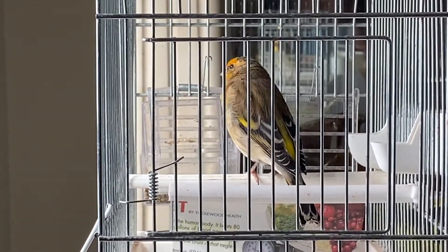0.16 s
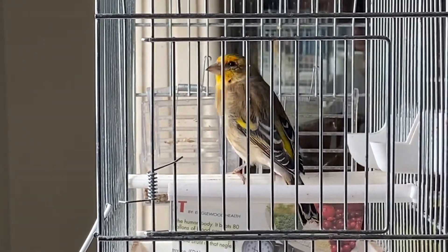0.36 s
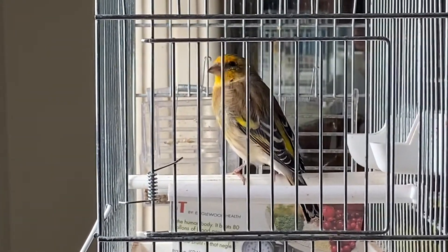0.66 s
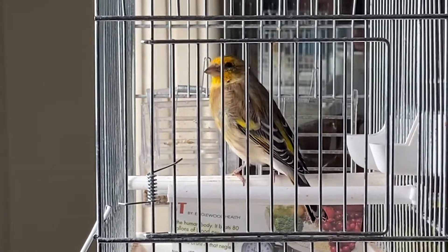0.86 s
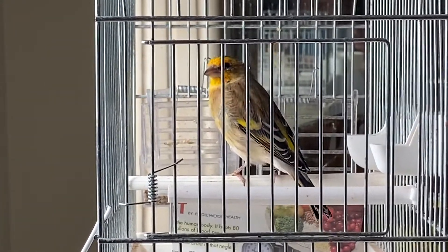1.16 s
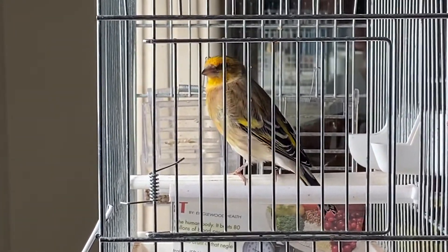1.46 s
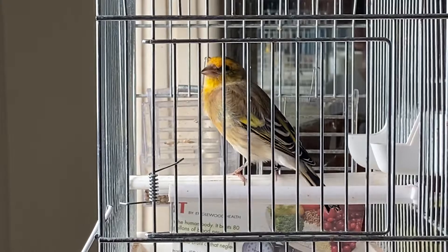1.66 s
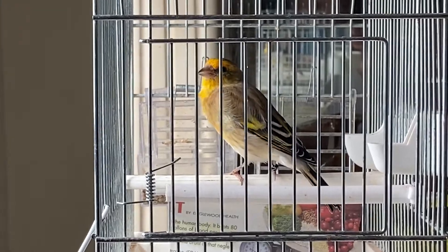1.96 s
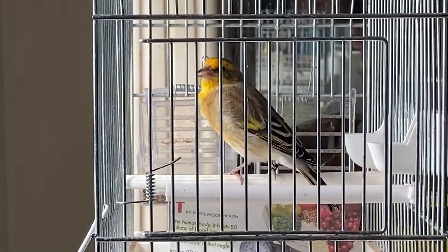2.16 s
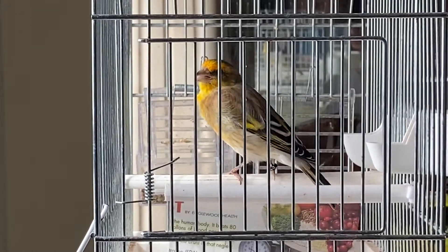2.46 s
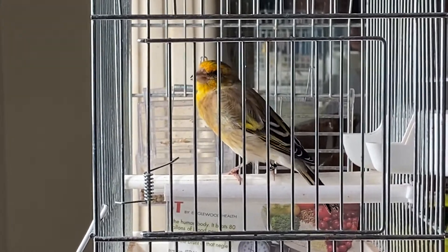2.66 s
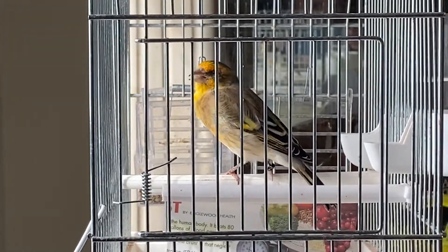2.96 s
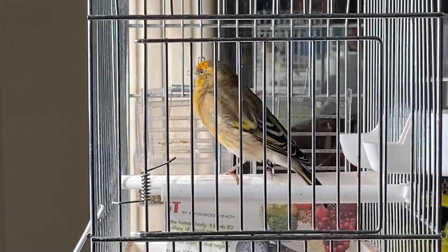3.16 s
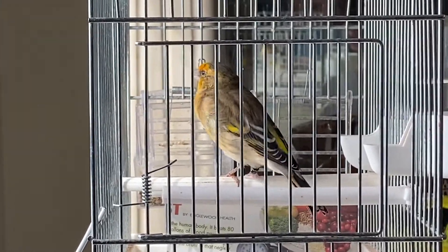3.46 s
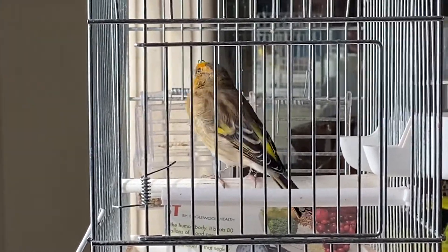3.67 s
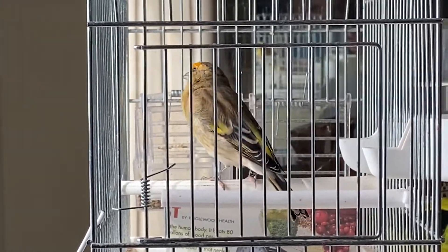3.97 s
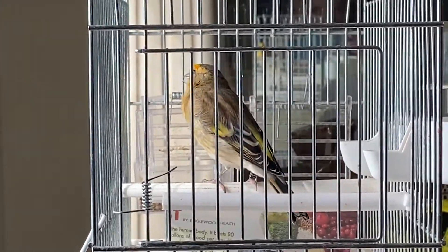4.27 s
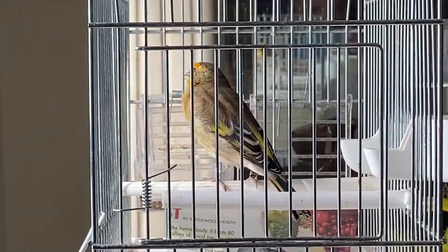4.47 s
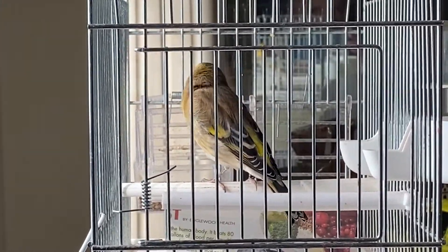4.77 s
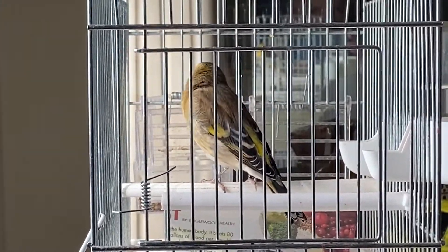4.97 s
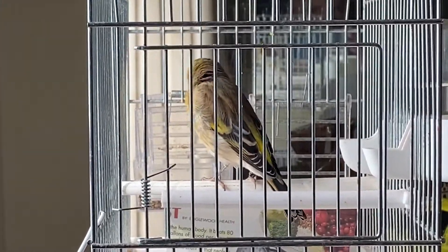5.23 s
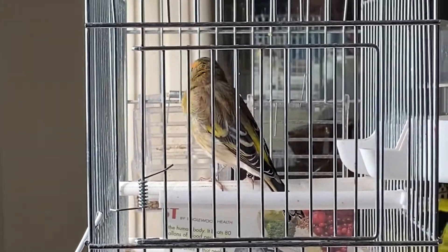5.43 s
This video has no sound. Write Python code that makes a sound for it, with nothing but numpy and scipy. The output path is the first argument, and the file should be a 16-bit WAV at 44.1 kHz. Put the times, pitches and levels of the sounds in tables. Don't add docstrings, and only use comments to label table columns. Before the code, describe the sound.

A small caged finch sings a rapid, high twittering run of gliding whistles in a small echoing room over a faint low hum.

```python
import sys
import numpy as np
from scipy import signal
from scipy.fft import rfft, irfft, next_fast_len
from scipy.io import wavfile
from scipy.ndimage import uniform_filter1d

SR = 44100
rng = np.random.default_rng(int(sys.argv[2]) if len(sys.argv) > 2 else 0)


def persist_wave(psi):
    counts = np.round(np.clip(psi, -1, 1) * 32767).astype(np.int16)
    wavfile.write(sys.argv[1], SR, np.atleast_2d(counts).T)


def level_to_linear(level):
    exponent = np.asarray(level, float) / 20
    return 10 ** exponent


N = 246959


def evened(x):
    return x / np.sqrt(np.mean(x ** 2) + 1e-20)


def read(points, hz):
    f, value = np.transpose(points)
    return np.interp(np.log(hz + 1), np.log(f + 1), value)


def add(mix, s, sound):
    part = mix[round(s * SR):][:len(sound)]
    part += sound[:len(part)]


def drift(size, hz):
    lead_in = 4000
    b, a = signal.butter(N=2, Wn=hz, fs=SR)
    return evened(signal.lfilter(b, a, rng.standard_normal(size + lead_in))[lead_in:])


def resonate(x, hz, width):
    turn = np.exp(2j * np.pi * np.cumsum(hz * np.ones(len(x))) / SR)
    r = np.exp(-np.pi * width / SR)
    return 2 * (turn * signal.lfilter([1 - r], [1, -r], x / turn)).real


def air():
    # (frequency [Hz], level per Hz [dB])
    air_tone = [(22, -27), (36, -5), (56, 3.5), (98, -9), (150, -8.5), (190, -10.5), (235, -7),
                (330, -18.5), (600, -23.5), (1700, -34), (5200, -50), (5900, -52.5), (9000, -56.5),
                (16000, -65.5)]
    # (frequency [Hz], likeness [-1 to 1])
    likeness = [(60, 0.97), (130, 0.91), (290, 0.6), (640, 0.28), (1400, 0.07), (2000, 0.24), (3000, 1),
                (7000, 1), (15000, .9)]
    # (frequency [Hz], left over right [dB])
    left_lean = [(60, .6), (125, 3.5), (250, 1.2), (500, 1.8), (2000, 0)]
    frames, hz = N // 512 + 5, np.fft.rfftfreq(2048, 1 / SR)
    a, b, c, d = rng.standard_normal((frames, 1025, 4)).T
    same = np.clip(read(likeness, hz), -1, 1)[:, None]
    left = a + 1j * b
    right = same * left + np.sqrt(1 - same ** 2) * (c + 1j * d)
    lean_db = np.multiply.outer([.5, -.5], read(left_lean, hz))[:, :, None]
    z = np.array([left, right]) * level_to_linear(read(air_tone, hz)[:, None] + lean_db)
    noise = signal.istft(z, nperseg=2048, noverlap=1536)[1][:, :N]
    return level_to_linear(-51.5) * evened(noise)


def fridge(motor_hz=58.69, waver_db=5.0, wander=0.00017):
    # (frequency [Hz], level [dB])
    casing = [(59, -58), (120, -72), (590, -80), (950, -100.5), (1115, -80), (1300, -109), (2150, -90.5),
              (2340, -81.5), (2550, -89.5), (3120, -102.5), (3230, -82.5), (3400, -101), (5150, -99),
              (5280, -93.5)]
    turns = np.cumsum(motor_hz * (1 + wander * drift(N, 1.46))) / SR
    t = np.arange(0, N, 64) / SR
    out = np.zeros(N)
    for k, (phase, rate, shift) in enumerate(rng.random((95, 3)), start=1):
        swell_db = waver_db * np.sin(2 * np.pi * ((0.419 + 2 * rate) * t + shift))
        level_db = read(casing, k * motor_hz) - 8 * max(k - 90, 0) + swell_db
        level = np.repeat(np.sqrt(2) * level_to_linear(level_db), 64)[:N]
        out += level * np.sin(2 * np.pi * (k * turns + phase))
    return out


def far_bird(width_hz=1300):
    # (time [s], length [s], level [dB], first pitch [Hz], last pitch [Hz])
    far_calls = [
        (.14, .15, -83, 6600, 5900),
        (.6, .08, -84, 6760, 6700),
        (.76, .07, -83, 6710, 6600),
        (.87, .24, -71, 4250, 3470),
        (1.027, 0.21, -72, 4850, 5400),
        (1.153, 0.13, -75, 3590, 3510),
        (1.214, 0.18, -72.5, 4670, 4300),
    ]
    out = np.zeros(N)
    for s, length, db, first_hz, last_hz in far_calls:
        u = np.arange(0, length, 1 / SR) / length
        hz = first_hz + (last_hz - first_hz) * u
        noise = np.resize(rng.standard_normal(SR // 2), len(u))
        fuzz = resonate(resonate(noise, hz, width_hz), hz, width_hz)
        swell_db = np.interp(u, [0, .33, 1], [-9, 0, -9])
        add(out, s, level_to_linear(db + swell_db) * evened(fuzz))
    return out * level_to_linear(1.4 * drift(N, 40))


def notes():
    # (time [s], length [ms], first pitch [Hz], goal pitch [Hz], level [dB])
    snaps = [(1.559, 25, 4566, 4796, -22.5), (1.62, 31, 6240, 3562, -19.5), (1.847, 35, 7560, 5640, -22),
             (1.987, 18, 3563, 3456, -21), (2.087, 42, 7200, 3177, -21.5), (2.222, 16.6, 7100, 3480, -19),
             (2.5164, 16, 7030, 3462, -20.5), (3.1211, 3.2, 5310, 4410, -19.5),
             (3.1222, 4.4, 4690, 3620, -26), (3.4216, 12, 6030, 5390, -19.5),
             (4.0816, 11.4, 2640, 3432, -28.5), (4.4988, 15, 4350, 3680, -29.5),
             (4.9658, 29, 3110, 3357, -27), (5.4254, 23.5, 5740, 5017, -28),
             (5.5327, 26, 2670, 4260, -31.5), (5.557, 21, 4260, 5050, -26.5)]
    chirps = [(1.544, 17.4, 5494, 4330, -24.5), (3.017, 15.5, 8400, 5200, -22.5),
              (2.9512, 19, 5080, 4398, -19), (3.126, 15, 3730, 2500, -47), (1.9681, 40.7, 4870, 3304, -21),
              (2.5621, 6.8, 5510, 3440, -25.5), (2.567, 11.6, 7100, 4960, -28),
              (2.6689, 15, 3295, 2120, -30), (2.7944, 21.6, 6420, 1570, -21.5),
              (2.857, 18.1, 5930, 4710, -21.5), (2.937, 14, 5360, 1990, -24.5),
              (2.942, 7.9, 7770, 4580, -28), (3.023, 10.6, 5600, 4600, -22),
              (3.1733, 11, 4360, 3330, -30.5), (3.18, 12, 7310, 4750, -24), (3.52, 32.3, 6900, 6270, -22),
              (4.6466, 20.8, 4480, 3540, -34), (4.8918, 21.6, 2470, 1870, -33.5),
              (5.327, 42, 5200, 3510, -35.5), (5.5691, 43, 4150, 3498, -23)]
    pips = [(3.721, 11, 3580, 5850, -45), (4.07, 12.2, 2660, 6720, -31.5), (4.24, 31, 5700, 7800, -26.5),
            (2.077, 9.7, 4820, 7630, -33), (1.538, 9.2, 3740, 5260, -32), (3.7428, 20.4, 5170, 7300, -28),
            (3.853, 12, 3390, 5040, -27), (3.9716, 15, 3650, 5320, -25.5), (4.3499, 10, 5470, 5830, -26),
            (4.4065, 23, 4310, 5220, -30), (5.532, 21, 5700, 7800, -40)]
    falls = [(1.876, 45.3, 5040, 4645, -24), (2.736, 17, 7860, 4320, -32), (2.738, 7, 6110, 4150, -25),
             (2.805, 20.4, 5390, 3400, -28.5), (3.1215, 15, 5710, 4380, -25.5),
             (3.2956, 8.2, 5830, 5420, -18), (3.3066, 8.7, 5335, 4750, -21),
             (1.6065, 15.7, 6950, 5900, -36), (3.406, 32, 6990, 5540, -27),
             (3.473, 39.6, 7290, 6200, -16.5), (3.61, 46, 7250, 6244, -17.5),
             (4.261, 25, 7960, 3620, -24.5), (4.431, 20.7, 5810, 1730, -25), (4.612, 12.7, 5530, 4320, -32),
             (4.978, 10, 7800, 7130, -38), (5.035, 30, 5800, 3900, -38), (5.278, 14.4, 2610, 2130, -28.5),
             (5.399, 23, 3320, 2920, -40), (5.052, 35.6, 2858, 2693, -23), (5.094, 29, 2645, 2230, -29),
             (5.321, 37, 2610, 1830, -29.5), (4.088, 27, 5850, 4610, -34.5),
             (5.362, 6.9, 3340, 2520, -34.5), (5.5528, 8.8, 5120, 4050, -27.5)]
    rises = [
        (2.968, 17.7, 4320, 4556, -17.5),
        (5.007, 22.2, 4840, 5780, -30),
        (1.601, 8, 5460, 7000, -30.5),
        (2.295, 16, 3280, 6070, -26.5),
        (3.943, 12.5, 2560, 5260, -34),
        (3.9598, 19.5, 2537, 4160, -25),
        (4.364, 12, 3957, 7340, -23.5),
    ]
    tips = [(1.7178, 29.7, 4993, 5430, -23.5), (2.311, 31, 3660, 1935, -18.5),
            (2.6926, 7.7, 5090, 4540, -35.5), (2.854, 4, 4540, 5750, -18), (3.0299, 5.2, 5650, 5260, -21),
            (3.2898, 6.4, 5010, 3840, -28), (3.5502, 4.9, 5840, 6180, -19), (3.274, 22, 6340, 7240, -28),
            (3.836, 16, 4630, 6280, -34), (3.8464, 6.5, 3062, 3150, -25), (4.1525, 18.3, 4024, 4820, -23.5),
            (4.513, 5.2, 4286, 3120, -22.5), (4.83, 40, 3160, 2500, -34.5), (5.227, 37, 3386, 3050, -35),
            (5.277, 5.3, 5790, 4660, -36)]
    arches = [(1.527, 10.5, 3400, 2890, -38), (1.7443, 13.8, 5140, 4484, -23),
              (1.8298, 12.5, 8080, 7110, -35.5), (1.939, 33.3, 4460, 4790, -23),
              (3.551, 16, 4750, 4682, -25.5), (4.358, 17, 5600, 3950, -34.5), (4.379, 9.2, 5910, 6720, -22),
              (4.4172, 19, 5320, 5850, -30), (4.5006, 11.7, 5070, 4275, -23),
              (4.5905, 12.3, 4460, 5160, -32.5), (4.8624, 40, 2630, 2517, -26),
              (4.9696, 32.3, 3590, 4116, -28.5), (5.214, 64, 2683, 2304, -32.5),
              (5.366, 56, 4210, 4880, -32)]
    hooks = [
        (2.6836, 18.3, 2280, 2522, -24),
        (2.7284, 18, 5300, 3510, -29.5),
        (3.4161, 16, 4570, 4713, -25.5),
        (3.731, 11, 5950, 5355, -21),
        (4.8166, 51.5, 3700, 4177, -30),
        (5.0293, 3.4, 5440, 5720, -25),
    ]
    # (time [s], length [ms], pitch [Hz], level [dB])
    level_notes = [(5.006, 18, 5900, -38), (5.288, 14, 4370, -35.5), (2.7032, 18, 3406, -28),
                   (3.4345, 6.9, 4910, -24.5), (3.606, 7, 6960, -19.5), (4.164, 37, 6320, -35.5),
                   (4.6742, 26, 3398, -25), (4.9043, 18, 2720, -34.5), (5.075, 9.7, 2665, -19),
                   (5.449, 9.6, 4970, -28.5), (5.359, 8.7, 4270, -29.5), (5.577, 72, 7800, -34)]
    # (time [s], top pitch [Hz], drop level [dB], slide level [dB])
    rattle = [
        (2.1432, 5540, -18, -27),
        (2.1818, 6910, -24, -29.5),
        (2.3787, 4970, -20.5, -24),
        (2.4266, 5990, -21.5, -24),
        (2.4702, 5620, -20, -23.5),
    ]
    sagging = [(s, ms, hz, hz * .98, db) for s, ms, hz, db in level_notes]
    drops = [(s, 9, top_hz, 3400, drop_db) for s, top_hz, drop_db, _ in rattle]
    slides = [(s + .0023, 19, 3790, 2500, slide_db) for s, _, _, slide_db in rattle]
    kinds = [((.92, .95), snaps),
             ((.72, 1), chirps + pips + drops),
             ((.52, 1), falls + rises + slides),
             ((.191, 1), tips + sagging),
             ((1, .015), arches),
             ((1, .93), hooks)]
    song = []
    for (half, last), rows in kinds:
        for s, ms, first, goal, db in rows:
            way = goal - first
            song.append((s, ms, first, first + half * way, first + last * way, db))
    return song


def glide(start, middle, end, u):
    first, second = middle - start, end - middle
    if first * second > 0 and abs(second - first) > 1:
        bend = (second / first) ** 2
        return start + (end - start) * (bend ** u - 1) / (bend - 1)
    return start + 4 * first * u * (1 - u) + (end - start) * u * (2 * u - 1)


def throb(depth=.7):
    # (time of first puff [s], puffs [count], rate [puffs per s])
    puffing = [
        (3.4855, 6, 79),
        (3.621, 4, 98),
        (5.367, 6, 115),
        (5.432, 4, 128),
    ]
    gain = np.zeros(N)
    for s, puffs, rate in puffing:
        turns = np.arange(-.25, puffs - .75, rate / SR)
        add(gain, s + turns[0] / rate, depth * np.cos(2 * np.pi * turns))
    return 1 + gain


def finch(flutter_db=2.0, flutter_hz=200, waver=0.0065, edge_ms=1.6, skew=0.95, haste=0.27,
          breath_db=-36, rasp=7.9, coupling_db=-14):
    # (multiple of the pitch, level [dB])
    overtones = [(2, -24.5), (3, -31), (4, -45)]
    # (frequency [Hz], level [dB])
    beak = [(1500, -13), (2000, -17.5), (2600, -9), (3300, -1.5), (5000, 2), (6500, -2.5), (7500, -4.5),
            (8500, -13.5), (10500, 4), (13000, -0.5), (15500, 1)]
    song = notes()
    out, flow = np.zeros(N), np.zeros(N)
    shake = 1 + waver * drift(N, 254)
    for (s, ms, start, middle, end, db), phase in zip(song, rng.random((len(song), 1))):
        t_ms = np.arange(-edge_ms, ms + edge_ms, 1000 / SR)
        at = round((s - edge_ms / 1000) * SR)
        hz = glide(start, middle, end, np.clip(t_ms / ms, 0, 1))
        hz = hz * np.resize(shake[at:], len(t_ms))
        turns = np.cumsum(hz) / SR + phase
        tone = np.zeros(len(t_ms))
        for k, k_db in [(1, 0.027)] + overtones:
            level = level_to_linear(k_db + read(beak, k * hz)) * (k * hz < SR / 2)
            tone += level * np.sin(2 * np.pi * k * turns)
        peak_at = skew * level_to_linear(haste * 6 * (min(end, start) - start) / start)
        swell = level_to_linear(db) * abs(np.sin(np.pi * np.linspace(0, 1, len(t_ms)) ** peak_at)) ** .85
        swell *= signal.windows.tukey(len(t_ms), min(4 * edge_ms / (ms + 2 * edge_ms), 1))
        add(out, at / SR, 2 * swell * tone)
        add(flow, at / SR, swell * (1 + rasp * abs(end - start) / ms / 200))
    sums = level_to_linear(coupling_db) * out ** 2
    breath = level_to_linear(breath_db) * flow * rng.standard_normal(N)
    top = signal.butter(N=4, Wn=8500, btype="high", fs=SR, output="sos")
    voice = out + signal.sosfilt(top, sums + breath)
    return voice * level_to_linear(flutter_db * drift(N, flutter_hz)) * throb()


def room(x, tail_db=-6, gap_ms=2.77):
    # (delay [ms], level [dB])
    walls = [(3.1, -10), (8.5, -10.5), (12.5, -20.5), (19, -22.5)]
    # (frequency [Hz], time [s])
    dying = [(1500, 0.46), (3000, 0.42), (5500, 0.39), (8000, 0.32), (14000, 0.22)]
    shape = (3, SR // 2)
    taps = rng.choice([-1., 1.], shape) * (rng.random(shape) < .1)
    hz, t, z = signal.stft(taps, SR, nperseg=128)
    tails = signal.istft(z * level_to_linear(-60 * t / read(dying, hz)[:, None]), SR, nperseg=128)[1]
    tails = tails * np.clip(np.arange(tails.shape[1]) * 1000 / SR / gap_ms - .5, 0, 1)
    turns = 2.3 * np.arange(N) / SR + np.arange(3)[:, None] / 3
    share = np.cos(2 * np.pi * turns) * np.sqrt(2 / 3)
    echoes = signal.fftconvolve(x * share, tails / np.linalg.norm(tails[0]), axes=1)[:, :N]
    out = x + level_to_linear(tail_db) * echoes.sum(0)
    for ms, db in walls:
        add(out, ms / 1000, level_to_linear(db) * x)
    return out


def perch():
    # (frequency [Hz], width [Hz], level [dB])
    ringing = [(448, 24, 3), (576, 23, -2.5), (863, 17, 1), (1270, 400, -4)]
    # (time [s], level [dB])
    knocks = [
        (5.514, -53),
        (5.526, -50.5),
        (5.539, -48),
        (5.565, -51),
    ]
    pushes = np.zeros(N)
    for (s, db), scuff in zip(knocks, rng.standard_normal((len(knocks), 500))):
        add(pushes, s, level_to_linear(db) * scuff * np.exp(-np.arange(500) / 150) / 8)
    out = np.zeros(N)
    for hz, width, db in ringing:
        out += level_to_linear(db) * resonate(pushes, hz, width) * SR / (2 * np.pi * width)
    return out


def scene():
    return room(finch()) + far_bird() + fridge() + perch() * level_to_linear([[2], [-2]]) + air()


def roll_off(x):
    return signal.sosfilt(signal.butter(12, 16730, fs=SR, output="sos"), x)


def record(dry):
    # (frequency [Hz], lead [radians])
    port_lead = [(1000, 0), (2000, .3), (5000, .17), (7490, -.1), (8530, -2.5), (9400, -3.8), (10900, -6.1),
                 (11600, -6.6), (12700, -9.0), (13700, -9.8), (14700, -12.2), (16300, -12.8)]
    # (frequency [Hz], level [dB])
    mic = [(20, -23), (30, -10.5), (42, -1), (15900, -0.5), (16250, -33), (17000, -76)]
    size = next_fast_len(N + 2048)
    hz = np.fft.rfftfreq(size, 1 / SR)
    lead = np.interp(hz, *np.transpose(port_lead))
    response = level_to_linear(read(mic, hz)) * np.exp(.5j * np.outer([1, -1], lead))
    ports = irfft(rfft(dry, size) * response, size)[:, :N]
    power = abs(uniform_filter1d((ports ** 2).mean(0), 9000))
    over_db = np.maximum(10 * np.log10(power + 1e-12) + 30.5, 0)
    return roll_off(ports * level_to_linear(-.12 * over_db))


dry = scene()
out = record(dry)
persist_wave(out)
```